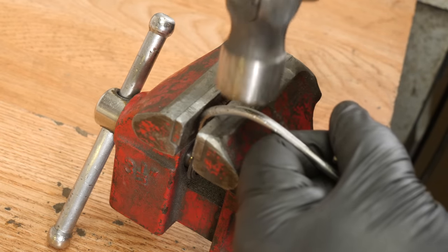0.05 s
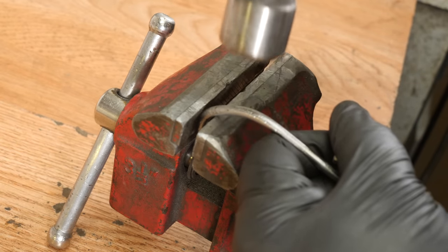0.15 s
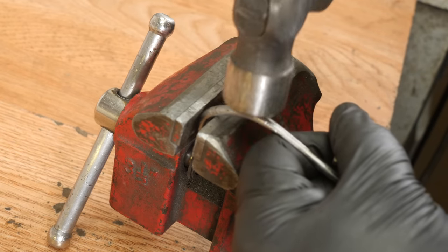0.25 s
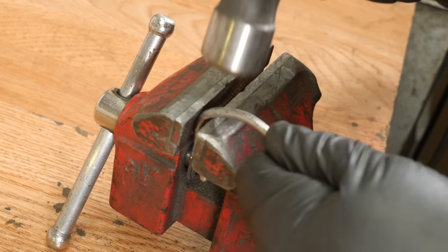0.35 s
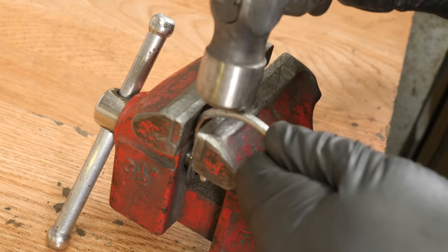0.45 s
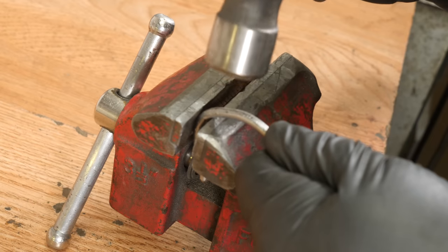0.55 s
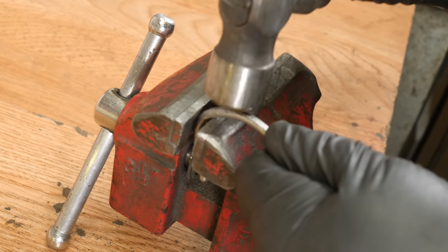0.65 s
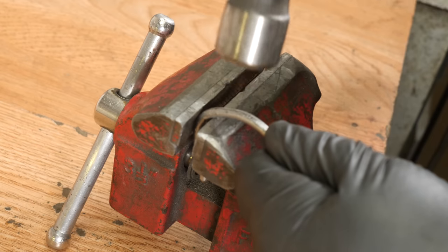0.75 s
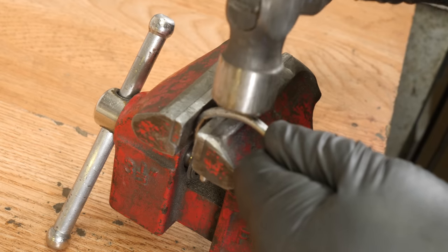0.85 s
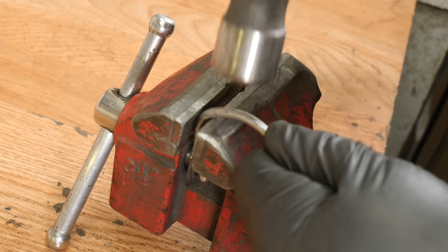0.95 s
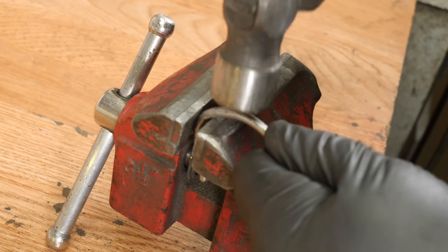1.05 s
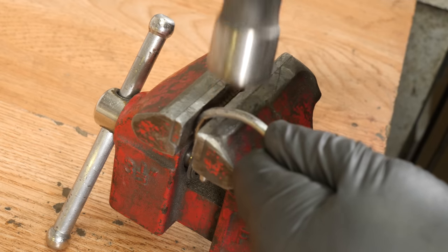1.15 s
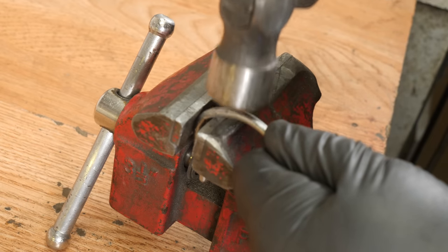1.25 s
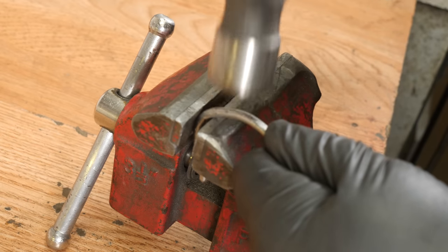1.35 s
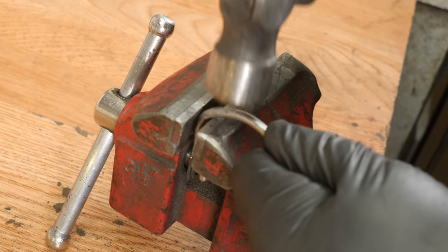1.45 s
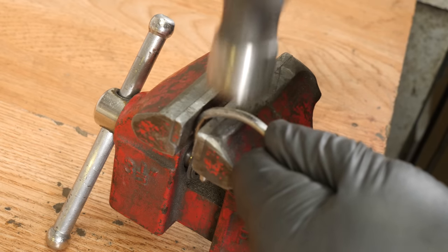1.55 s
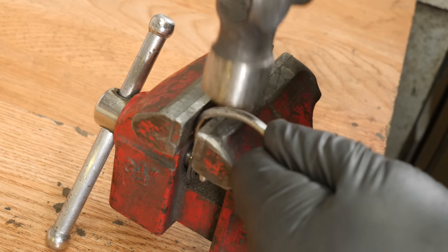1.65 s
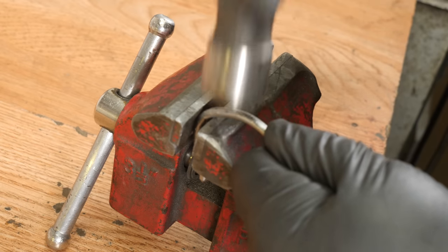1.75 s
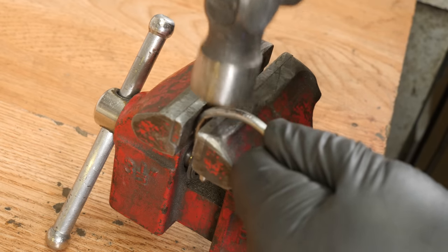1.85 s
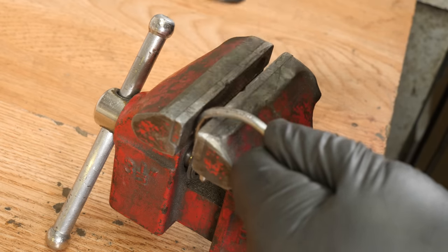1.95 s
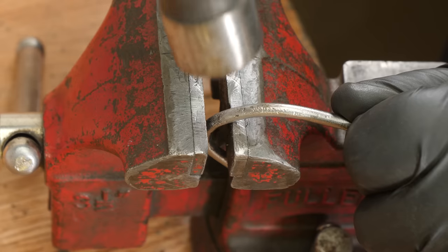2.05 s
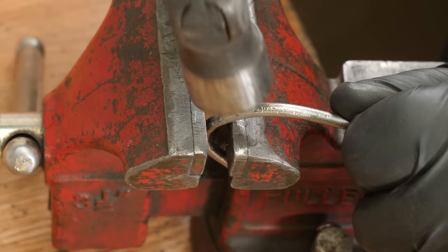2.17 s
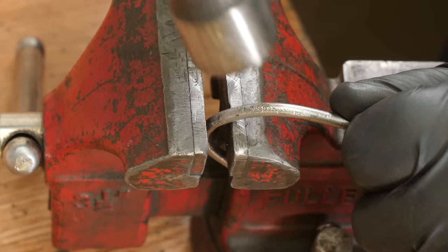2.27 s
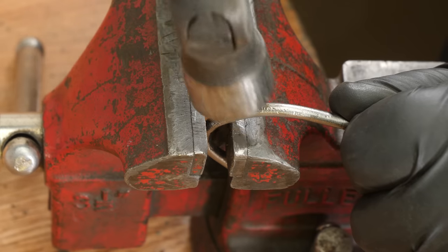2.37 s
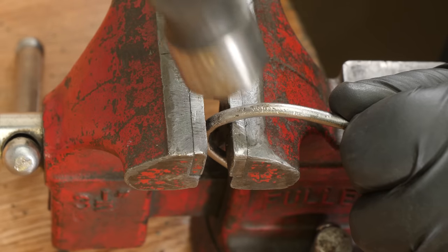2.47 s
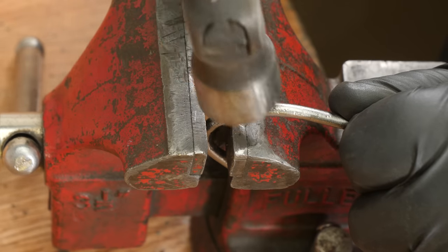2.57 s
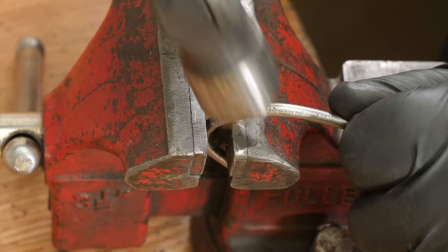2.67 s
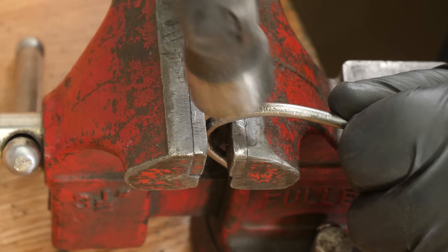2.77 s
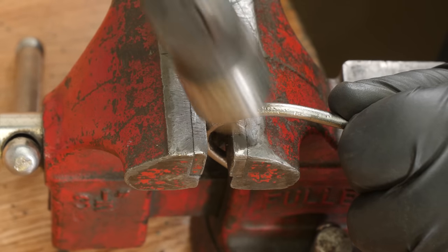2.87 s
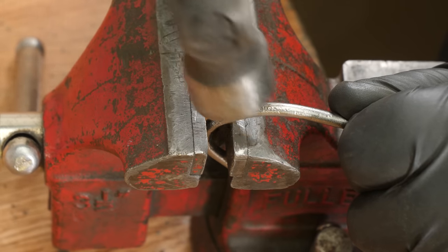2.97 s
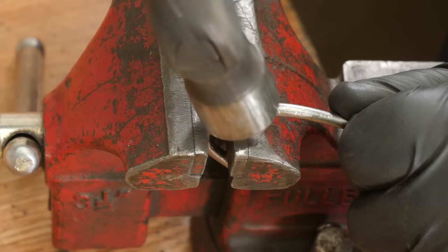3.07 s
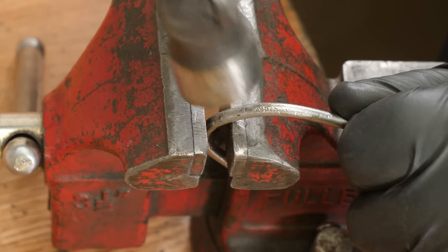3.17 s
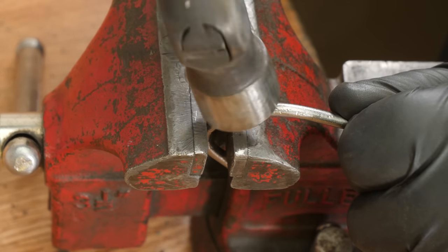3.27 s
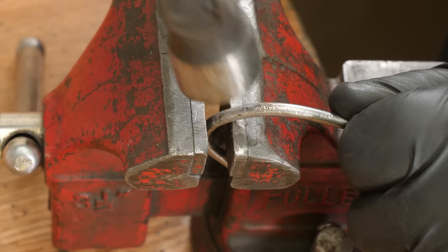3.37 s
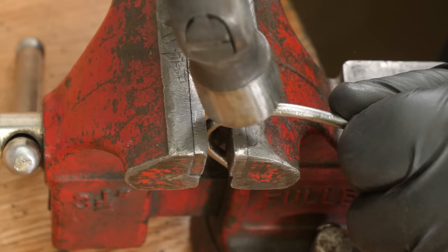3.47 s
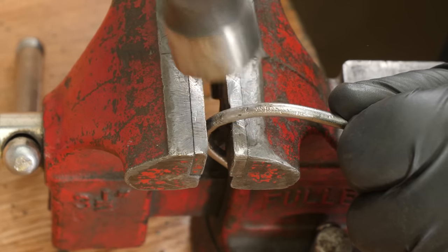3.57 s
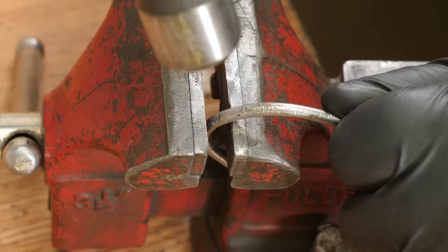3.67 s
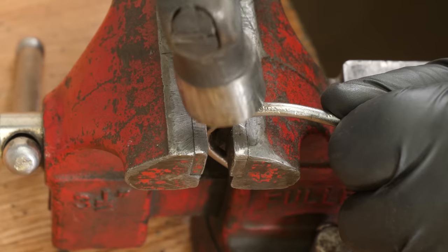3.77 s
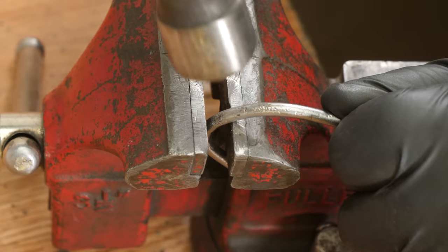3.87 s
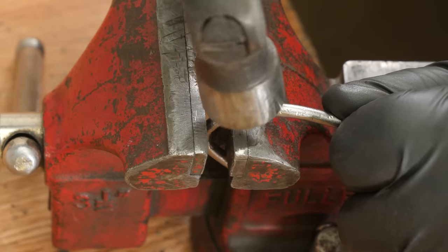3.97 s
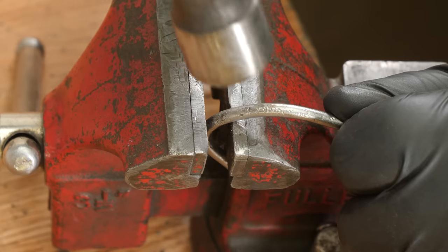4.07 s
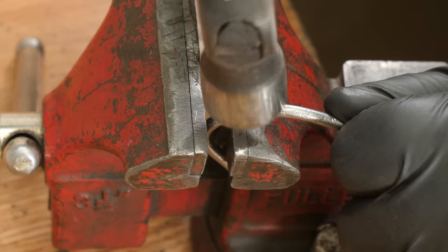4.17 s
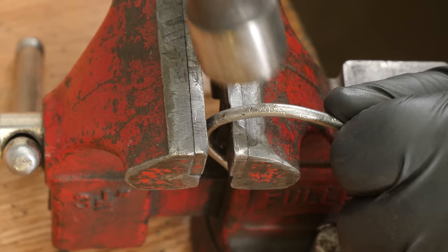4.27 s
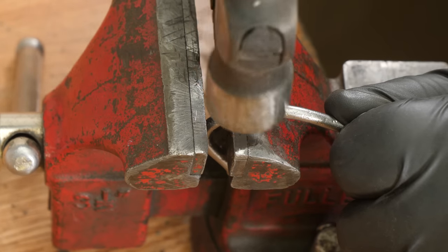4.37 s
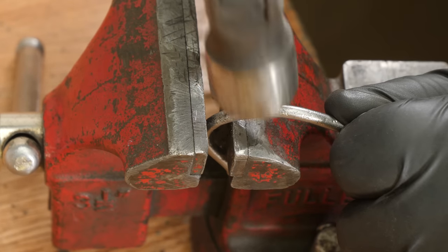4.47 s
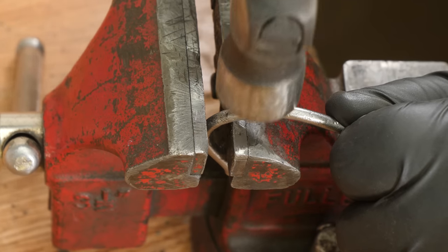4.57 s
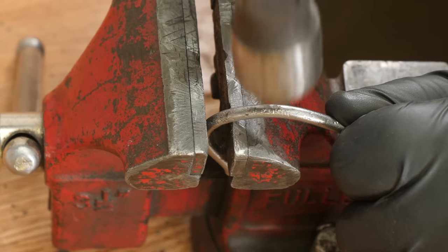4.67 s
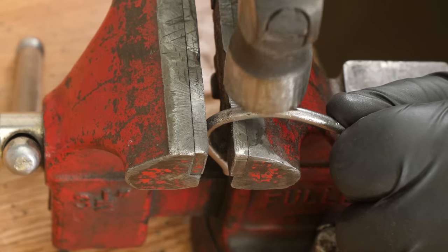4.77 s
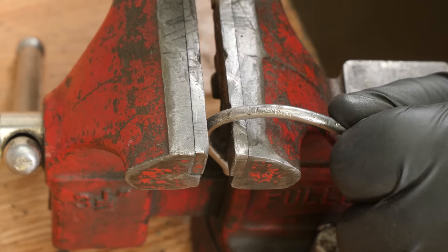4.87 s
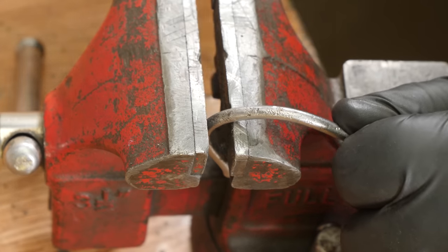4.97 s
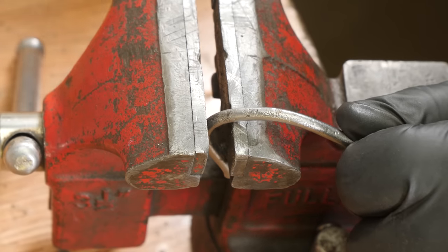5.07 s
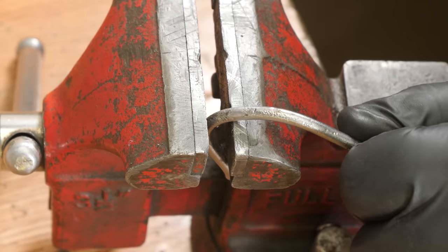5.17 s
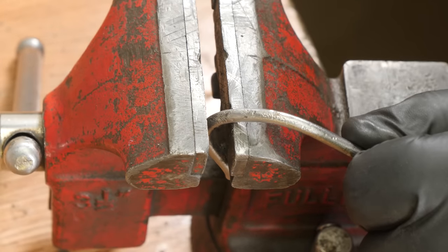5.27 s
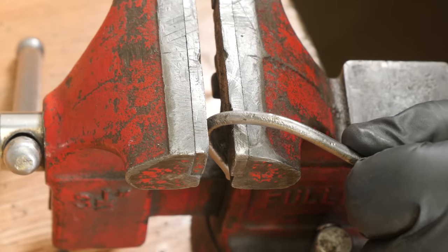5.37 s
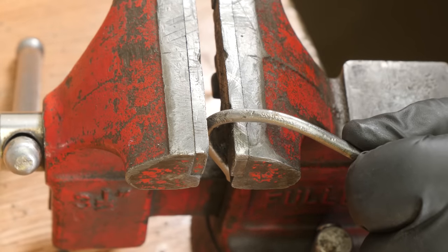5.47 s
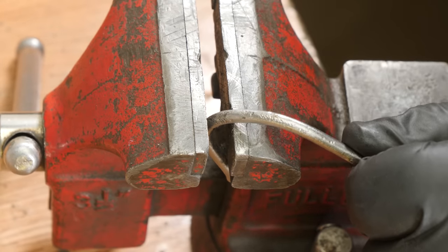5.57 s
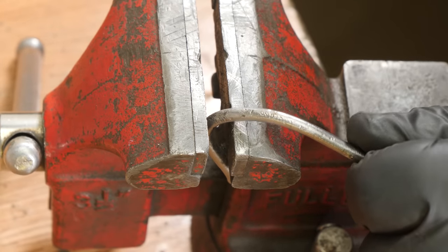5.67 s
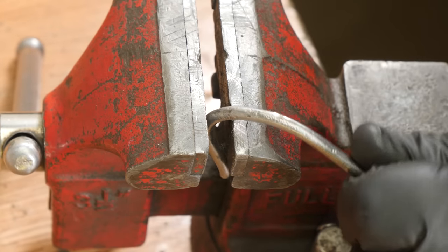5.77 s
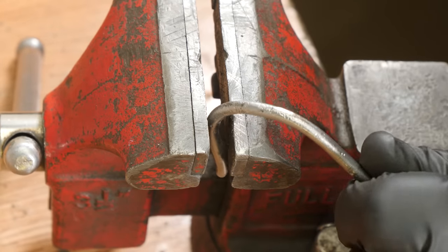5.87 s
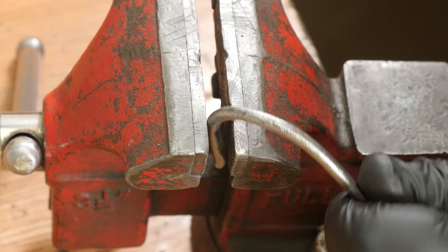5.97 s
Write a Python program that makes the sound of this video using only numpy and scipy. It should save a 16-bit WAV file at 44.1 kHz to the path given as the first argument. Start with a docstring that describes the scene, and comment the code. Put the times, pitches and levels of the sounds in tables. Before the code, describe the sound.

Steady fast hammering on steel: each hit combines a hard clank, a boxy low-mid bench thud, a bright clang and a brief room splash. Early hits are lighter, middle ones loud and clipped, with a high hammer-head ping. One brief hesitation interrupts the rhythm. At the end, quiet room rumble, wavering hum, soft glove scuffs and a couple of duller rod knocks in the jaws.

```python
"""A steel hammer beats a bent rod over the jaws of a bench vise, close to a microphone that overloads.
Each blow rings the vise and bench as dying sines, rocks the bench on its legs and splashes a short
clang of shaped noise round the workshop. At the end the loose rod knocks and groans in the jaws, over
a low hum and the quiet noise of the room. Two splices cut the ringing short and shift the microphone."""
import sys
import numpy as np
from scipy import signal
from scipy.fft import rfft, irfft
from scipy.io import wavfile
from scipy.ndimage import uniform_filter1d

SR = 44100
rng = np.random.default_rng(int(sys.argv[2]) if len(sys.argv) > 2 else 0)


def master_out(mix):
    """Clip the mix to full scale and print it as 16-bit PCM to the path in sys.argv[1]."""
    frames = np.transpose(np.atleast_2d(mix))
    ceiling = np.clip(frames, -1, 1)
    pcm = np.round(ceiling * 32767).astype(np.int16)
    wavfile.write(sys.argv[1], SR, pcm)


N = 265923  # length in samples

# vise and bench top, ringing modes: pitch_hz, level_db, t60_s
BENCH_MODES = [(109.5, -20, 0.17), (147, -18, 0.21), (163.5, -30.5, 0.13), (254.8, -20, 0.28),
               (280.4, -20.5, 0.27), (336.4, -9, 0.12), (361.5, -24.5, 0.073), (390.7, -11.5, 0.091),
               (396.2, -12, 0.17), (434.5, -12.5, 0.15), (466.6, -0.5, 0.12), (547.6, -13.5, 0.17),
               (597.4, -1, 0.072), (626, -19.5, 0.21), (654, -12, 0.15), (690, -6.5, 0.08),
               (709.7, -8.5, 0.13), (776.5, -11, 0.094), (831, -13, 0.17), (907, -12, 0.15), (978, -9, .11),
               (1044.6, -8, 0.08), (1195, -9, 0.049), (1312, -12, 0.15), (1400, -10.5, 0.02),
               (1465, -9, 0.091), (1518, -17, 0.11), (1610, -20.5, 0.15)]
# splices that end the blows' ringing: time_s, fade_s
SPLICES = [(.41, .003), (2.0262, .0003)]
# microphone place before, between and after the splices: clang_tilt_db_per_octave, thump_db (at 0 dB force),
# thump_hz, jaw_ring_db (at 0 dB clang), rebound_db (against force), head_ring_t60_s
PLACES = [(-0.1, -5, 200, 6, -50.5, .12), (4, -5.5, 190, -9, -57, 0.12),
          (-0.4, -7.5, 191, 0.5, -65.5, 0.092)]


def blow(s, force_db, clang_db, head_db, tick_db):
    """Rocking, thump and jaw ring follow force or clang and the place; head ring and tick have own levels."""
    tilt_db, thump_db, thump_hz, jaw_db, rebound_db, head_t60_s = PLACES[place_at(s)]
    rock_db = -13 + 0.66 * force_db  # rocking follows force less than in step
    soft_db = -0.44 + 0.2634 * force_db  # dB per octave: a harder blow is shorter and brighter
    thump_db = thump_db + 1.12 * force_db
    jaw_db = jaw_db + 1.16 * clang_db
    stretch = 1.123  # factor on the clang's t60
    contact = (s, force_db, rock_db, clang_db, thump_db, thump_hz, soft_db, tilt_db, tick_db, jaw_db, stretch)
    head = [(10646, head_db, head_t60_s)]  # the hammer head's one clear mode: Hz, dB, t60 s
    rebound = (s + 0.158, force_db + rebound_db, 0.016)  # a faint scuff follows each blow
    return contact, head, rebound


def strike(contact, signs, shared):
    """One contact: a softer contact lasts longer and tilts the bench modes towards the bass."""
    s, bench_db, rock_db, clang_db, thump_db, thump_hz, soft_db, tilt_db, tick_db, jaw_db, stretch = contact
    t = np.arange(int(0.8 * SR)) / SR
    bench = gain_of(bench_db) * bench_ring(t, signs, soft_db, shared)
    rocking = gain_of(rock_db) * bench_rocking(t)
    thump = gain_of(thump_db) * vise_thump(t, thump_hz)
    jaws = gain_of(jaw_db) * jaw_ring(t)
    treble = gain_of(clang_db) * clang(t, tilt_db, stretch, shared) + gain_of(tick_db) * tick(t)
    treble *= chatter(t, depth_db=1.5)
    return s, bench + rocking + thump + jaws + treble


def bench_ring(t, signs, soft_db, shared):
    """Vise and bench top ring in their modes, with a dense low boom and faint lingering tones."""
    # low boom of dense noise: pitch_hz, level_db_per_hz
    boom = [(60, -35.5), (130, -3), (300, -2), (600, -4.5), (1100, -3.5), (1800, -20), (3000, -40)]
    # loose sheet metal nearby: pitch_hz, level_db, t60_s
    sheet_metal = [(173, -41, 0.74), (253.4, -41.5, 0.65), (343, -40.5, 0.63), (412, -45, 1),
                   (614, -38.5, 0.71)]
    reach = gain_of(soft_db * np.log2(np.transpose(BENCH_MODES)[0] / 500))
    # the rod is never hit at quite the same place
    spot = gain_of(1.5 * rng.standard_normal(len(BENCH_MODES)))
    bench = ring(BENCH_MODES, t, signs * reach * spot, rise_turns=0.72)
    bench += gain_of(-7.5) * wash(boom, soft_db, 0.99, t, shared) * (1 - np.exp(-t / 0.00079))
    # the direct sound is stronger than what the room returns
    bench *= 1 + 0.47 * np.exp(-t / 0.0083)
    return bench + ring(sheet_metal, t, np.ones(len(sheet_metal)), rise_turns=4.5)


def bench_rocking(t):
    """The bench rocks on its legs in a few low modes, neighbours in opposition."""
    # rocking modes: pitch_hz, level_db, t60_s
    rocking = [(39.2, -2, 0.24), (53.46, -11, 1), (61.02, 0, 0.75), (81, -1.5, 0.13)]
    return ring(rocking, t, (-1.0) ** np.arange(len(rocking)), rise_turns=0.7)


def vise_thump(t, thump_hz):
    """The bench top yields under the vise: close modes start together and drift apart."""
    # thump modes: factor_on_thump_hz, level_db, t60_s
    thump = [(.93, -2.5, 0.11), (1.03, 3.5, 0.11), (1.16, 5, 0.057)]
    return ring(np.multiply(thump, [thump_hz, 1, 1]), t, -np.ones(len(thump)), rise_turns=0.29)


def jaw_ring(t):
    """Steel jaw plates and rod end ring; the rod shifts, and the jaw modes with it."""
    # jaw modes before the shift: pitch_hz, level_db, t60_s
    jaws = [(1430, -10.5, 0.039), (1730, -10, 0.023), (2130, -7, .065), (2940, -10, 0.038),
            (3280, -13, 0.033), (3920, -10.5, 0.038), (3910, -8, 0.05), (4470, -12.5, 0.087),
            (5490, -7, 0.14), (6190, -3.5, 0.061)]
    grip = 1 + 0.012 * rng.standard_normal((len(jaws), 1)) * [1, 0, 0]
    shares = gain_of(3.0 * rng.standard_normal(len(jaws)))  # uneven by some 3 dB
    return ring(np.multiply(jaws, grip), t, shares, rise_turns=4.0)


def clang(t, tilt_db, stretch, shared):
    """Bright splash round the workshop, strongest in its first few milliseconds."""
    # clang colour before its tilt: pitch_hz, level_db_per_hz
    spectrum = [(700, -22), (1300, -0.5), (2000, 1), (2800, -1), (4300, 3), (5500, -3), (7000, -7),
                (9700, -12), (13000, -24), (16500, -21.5)]
    onset = (1 - np.exp(-t / 0.0013)) * (1 + 2.0 * np.exp(-t / 0.0045))
    return wash(spectrum, tilt_db, stretch, t, shared) * onset


def wash(spectrum, tilt_db, stretch, t, shared):
    """Dense reflections: treble dies first, the far walls answer weakly and for longer."""
    # decay of the reflections before the stretch factor: pitch_hz, t60_s
    decay_times = [(300, 0.18), (1000, 0.13), (3000, 0.12), (6000, 0.11), (10000, 0.088), (16000, 0.047)]
    hz, frames, z = noise(t[-1])
    # long waves repeat from blow to blow
    alike = np.clip(1 - hz / 9000, 0.5, 0.75)[:, None]
    z = alike * shared + np.sqrt(1 - alike ** 2) * z
    early_db = -60 * frames / (stretch * read(decay_times, hz))[:, None]
    late_db = -28 - 60 * frames / 0.5 - 4.5 * np.log2(1 + hz / 900)[:, None]
    decay = gain_of(early_db) + gain_of(late_db)
    colour = gain_of(read(spectrum, hz) + tilt_db * np.log2((hz + 200) / 4000))[:, None]
    x = signal.istft(z * decay * colour, nperseg=256, noverlap=192)[1][:len(t)]
    return x / np.sqrt(np.mean(x[:900] ** 2))  # rms 1 over the first 20 ms


def tick(t):
    """Steel on steel: a few milliseconds of the highest treble."""
    highpass = signal.butter(3, 10500, "high", fs=SR, output="sos")
    x = signal.sosfilt(highpass, rng.standard_normal(len(t)))
    # thrown back by a wall some seven metres off
    echo = 0.06 * np.exp(-((t - 0.04) / 0.0017) ** 2)
    return evened(x) * (np.exp(-t / 0.0038) + 0.13 * np.exp(-t / 0.017) + echo)


def chatter(t, depth_db):
    """The rod rebounds on the jaws, so the treble comes in uneven spurts."""
    x = uniform_filter1d(rng.standard_normal(len(t)), size=130)
    x = uniform_filter1d(x, size=130)
    return gain_of(depth_db * evened(x))


def knock(s, bench_db, clang_db, thump_db, thump_hz, soft_db, tilt_db, stretch):
    """The loose rod barely rocks the bench and leaves the hammer head silent."""
    rock_db = bench_db - 26.5
    tick_db, jaw_db = clang_db - 34, clang_db - 13
    return s, bench_db, rock_db, clang_db, thump_db, thump_hz, soft_db, tilt_db, tick_db, jaw_db, stretch


def rod_ring(rod_db, top_db):
    """The loose rod rings in its own modes, the top one more or less than the rest."""
    # rod modes: pitch_hz, level_db, t60_s
    rod = [(317, -26.5, 0.43), (4330, -25.5, 0.034), (9160, -37, 0.072), (12600, -45, .09)]
    t = np.arange(SR // 2) / SR
    extra_db = np.r_[np.zeros(len(rod) - 1), top_db]
    return ring(rod, t, gain_of(rod_db + extra_db), rise_turns=6.0)


def groan():
    """The rod drags in the jaws with a low groan."""
    # course of the groan: time_s, level_db, pitch_hz
    course = [(5.669, -48, 155), (5.74, -46, 160), (5.794, -32, 210), (5.839, -50, 198)]
    return waver(*np.transpose(course))


def scuff(s, db, half_length_s):
    """A short soft brush of bright noise, loudest at time s."""
    x = rng.standard_normal(int(2 * half_length_s * SR))
    x = signal.sosfilt(signal.butter(2, [2200, 6500], "band", fs=SR, output="sos"), x)
    return s - half_length_s, gain_of(db) * evened(x) * np.hanning(len(x))


def hum():
    """A low steady-pitched hum whose level wavers after the last blow."""
    # course of the hum: time_s, level_db
    course = [(4.93, -27), (4.969, -22.5), (5.052, -48), (5.11, -40), (5.26, -29), (5.462, -37),
              (5.53, -48.5), (5.596, -36.5), (5.76, -33.5), (5.95, -37.5), (6.03, -60)]
    return waver(*np.transpose(course), 56.8)


def workshop():
    """Quiet rumble and hiss of the room: noise shaped in frequency."""
    # colour of the room noise: pitch_hz, level_db_per_hz (relative)
    room = [(15, -28.5), (35, -1.5), (56, -17.5), (85, -17.5), (180, -17.5), (420, -31.5), (800, -36.5),
            (2000, -42), (6000, -48.5), (12000, -54.5), (17000, -70)]
    hz = np.fft.rfftfreq(N, 1 / SR)
    x = irfft(rfft(rng.standard_normal(N)) * gain_of(read(room, hz)), N)
    return gain_of(-58.5) * evened(x)


def gain_of(db):
    """Decibels to a factor."""
    return 10 ** (np.asarray(db) / 20)


def evened(x):
    """Scales to rms 1."""
    return x / np.sqrt(np.mean(x ** 2) + 1e-20)


def read(points, hz):
    """Reads a table on a log-frequency axis."""
    f, value = np.transpose(points)
    return np.interp(np.log(hz + 1), np.log(f + 1), value)


def ring(modes, t, shares, rise_turns):
    """Dying sines; each builds up with a time constant of rise_turns of its own cycles."""
    hz, db, t60 = np.transpose(modes)[:, :, None]
    swell = 1 - np.exp(-t * hz / rise_turns)
    fall = gain_of(db - 60 * t / t60)
    return (shares[:, None] * fall * swell * np.sin(2 * np.pi * hz * t)).sum(0)


def noise(seconds):
    """Random white short-time spectra: frequencies, frame times and complex values."""
    hz = np.fft.rfftfreq(256, 1 / SR)
    t = np.arange(int(seconds * SR / 64) + 5) * 64 / SR
    a, b = rng.standard_normal((len(t), len(hz), 2)).T
    return hz, t, a + 1j * b


def waver(s, db, hz):
    """One low tone that follows a level and a pitch curve."""
    t = np.arange(s[0], s[-1], 1 / SR)
    pitch_hz = np.interp(t, s, hz * np.ones(len(s)))
    tone = np.sqrt(2) * np.sin(2 * np.pi * np.cumsum(pitch_hz) / SR)
    fades = signal.windows.tukey(len(t), 0.027 / (s[-1] - s[0]))
    return s[0], gain_of(np.interp(t, s, db)) * tone * fades


def place_at(s):
    """Counts the splices before time s."""
    return sum(s > cut for cut, fade in SPLICES)


def at_places(heard):
    """Colours the blows by what each microphone place favours, and sums them."""
    # frequencies of the colour curves: pitch_hz
    colour_hz = [70, 120, 170, 250, 340, 800, 1400, 2900, 5000, 9000, 14000]
    # one row for each place: level_db at each of those frequencies
    colours = [
        [0.1, 0.5, 2.5, 1.3, -2.5, 0.1, -2.5, -0.5, 3.5, 0.95, 3],
        [0.1, -5.5, 0.5, 3.4, -3, 1.4, -4.5, 2.5, -2.5, 1.2, -2.5],
        [0.1, 3, 2.2, 0.6, -1, 0.32, -0.5, 0.7, 0.3, 0.1, 3],
    ]
    hz = np.fft.rfftfreq(N, 1 / SR)
    total = np.zeros(N)
    for blows, colour in zip(heard, colours):
        curve_db = read(np.transpose([colour_hz, colour]), hz)
        total += irfft(rfft(blows) * gain_of(curve_db), N)
    return total


def add(mix, s, sound):
    """Mixes a sound in at time s and ends it at the next splice."""
    t = s + np.arange(len(sound)) / SR
    for cut, fade in SPLICES:
        if s < cut:
            sound = sound * np.clip((cut - t) / fade, 0, 1)
    part = mix[round(s * SR):][:len(sound)]
    part += sound[:len(part)]


def scene():
    """Blows share one set of mode signs, the lowest moving together; a light knock starts all modes alike."""
    # hammer blows: start_s, force_db, clang_db, head_ring_db, tick_db
    blow_list = [(0.084, -17, -29, -56, -41.5), (0.292, -14, -24.5, -51.5, -26.5),
                 (0.48, -16.5, -37.5, -67, -54.5), (0.69, -12.5, -33.5, -57, -47),
                 (0.883, -10, -29, -56, -25.5), (1.068, -10, -25.5, -50, -20.5),
                 (1.259, -7.5, -20.5, -40, -24), (1.454, -7.5, -20.5, -23, -22),
                 (1.65, -6, -18.5, -20, -17), (1.848, -5, -16.5, -19.5, -24), (2.197, -5, -22, -24, -38),
                 (2.396, -1.5, -16, -22, -24.5), (2.583, -2.1, -15, -16, -36),
                 (2.769, -0.9, -12.5, -6.5, -23), (2.965, -1.2, -12, -11.5, -26),
                 (3.155, -1.4, -12.5, -5, -16.5), (3.348, -1.9, -13.5, -9.5, -25),
                 (3.54, -1, -13, -10, -19.5), (3.817, -4, -18.5, -13, -35), (4.004, -3.5, -19.5, -13, -24),
                 (4.196, -1.6, -15, -17.5, -12), (4.39, -1.6, -14.5, -47.5, -16),
                 (4.577, -4, -16, -17.5, -11), (4.776, -3, -14.5, -13.5, -17)]
    # loose rod against the jaws: start_s, bench_db, clang_db, thump_db, thump_hz, bench_tilt_db_per_octave,
    # clang_tilt_db_per_octave, factor_on_clang_t60, rod_ring_db, extra_db_on_top_rod_mode
    knock_list = [(3.662, -23.5, -45.5, -40, 167, -5, -2.5, 2, -35, -10.5),
                  (5.571, -16.5, -26.5, -19.5, 188.6, -5.5, -8.5, 0.88, -13, -14),
                  (5.775, -27, -51, -51, 167, -4.2, -6.5, 9, -35, -15),
                  (5.857, -13, -21, -17.5, 292, -1, -4, 1.02, -5.5, 1),
                  (6.013, -49, -54.5, -66, 304, 3.5, -7.5, 1.05, -25, -0.1)]
    # faint scuffs of glove and rod, the last row only a soft brush of noise leading into the loudest knock:
    # peak_s, level_db, half_length_s
    scuff_list = [(5.005, -66, 0.047), (5.106, -71.5, 0.064), (5.244, -67, 0.067), (5.444, -71.5, 0.047),
                  (5.7, -69, 0.012), (5.725, -68, 0.012), (5.759, -66, 0.023), (5.84, -65, 0.034)]
    mix = workshop()
    heard = np.zeros((len(PLACES), N))  # the blows, kept apart by microphone place
    t = np.arange(SR // 2) / SR
    shared = noise((int(0.8 * SR) - 1) / SR)[2]
    alternating = (-1.0) ** np.arange(len(BENCH_MODES))
    signs = np.where(np.transpose(BENCH_MODES)[0] < 300, -1, alternating)
    for row in blow_list:
        contact, head, rebound = blow(*row)
        add(heard[place_at(row[0])], *strike(contact, signs, shared))
        add(mix, row[0], ring(head, t, np.ones(1), rise_turns=110.0))
        add(mix, *scuff(*rebound))
    mix += at_places(heard)
    for *row, rod_db, top_db in knock_list:
        add(mix, *strike(knock(*row), -np.ones(len(BENCH_MODES)), shared))
        add(mix, row[0], rod_ring(rod_db, top_db))
    for row in scuff_list:
        add(mix, *scuff(*row))
    add(mix, *hum())
    add(mix, *groan())
    return mix[None]


def record(dry):
    """The microphone's input stage clips with a hard knee; then a low-pass limits the band."""
    overload, edge_hz = 0.63, 16300  # overload as a fraction of full scale
    clipped = dry / (1 + abs(dry / overload) ** 6.0) ** (1 / 6.0)
    lowpass = signal.firwin(255, edge_hz, window=("kaiser", 9), fs=SR)
    return signal.oaconvolve(clipped, lowpass[None], "same")


dry = scene()
out = record(dry)
master_out(out)
```